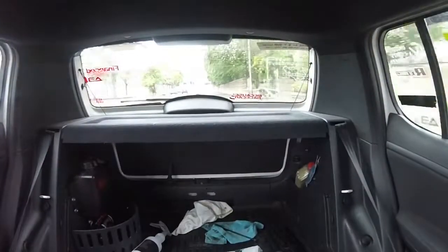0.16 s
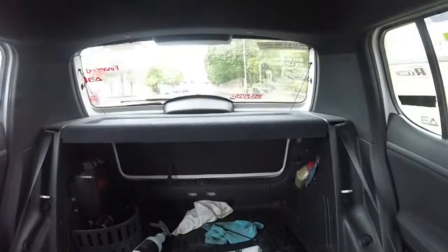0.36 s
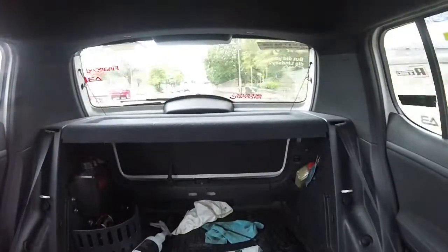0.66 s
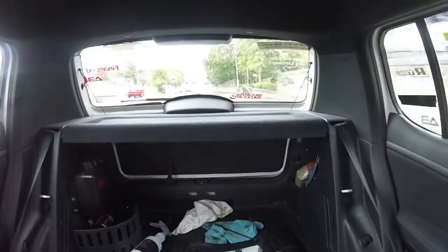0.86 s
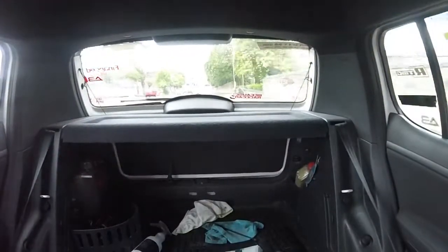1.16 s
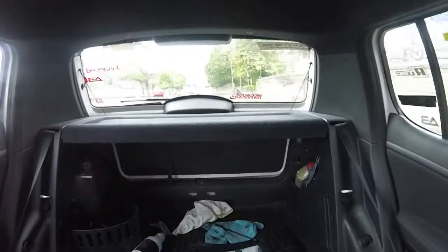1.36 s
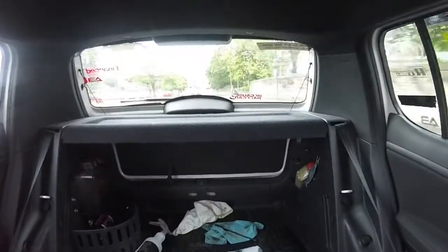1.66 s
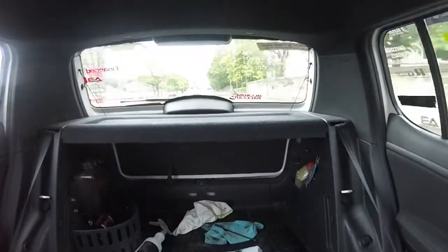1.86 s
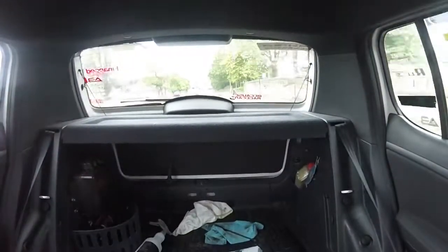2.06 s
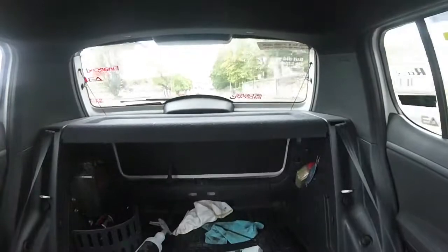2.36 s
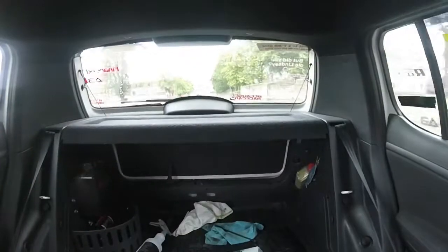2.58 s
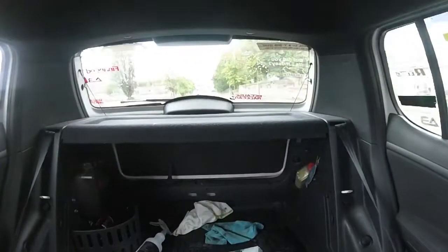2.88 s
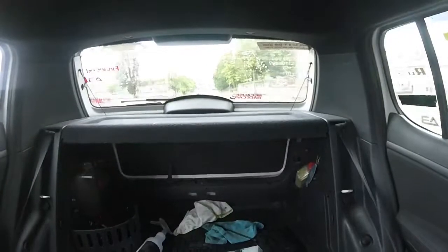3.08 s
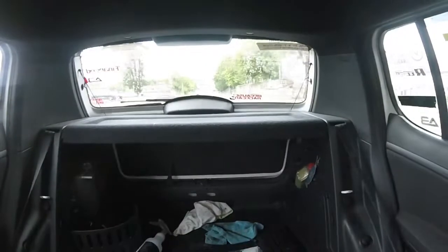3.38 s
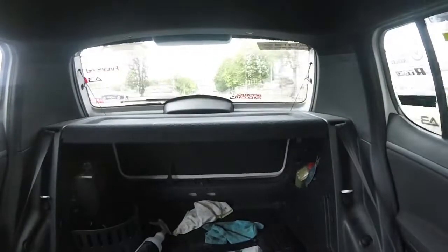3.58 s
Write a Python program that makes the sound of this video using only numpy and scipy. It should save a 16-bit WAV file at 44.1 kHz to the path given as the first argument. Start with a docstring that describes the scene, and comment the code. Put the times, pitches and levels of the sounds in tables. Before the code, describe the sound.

A car engine drones loudly and climbs in pitch inside the cabin, then the throttle lifts with a falling airy howl, a flutter of chuffs and low thumps, over steady road rumble, heard by a close interior microphone.

```python
"""Inside a small sporty car on the move, over road rumble that lasts throughout.
First the engine pulls: its notes rise through the booms of the cabin, with gear whine and clatter.
The throttle lifts: a howl with hissing air, probably vented boost, falls in pitch.
It breaks into a flutter of chuffs, each a short tone of sagging pitch, among low thumps and ticks of the trim.
Towards the end a light drone of a few steady lines comes up."""
import sys
import numpy as np
from scipy import signal
from scipy.fft import rfft, irfft
from scipy.io import wavfile
from scipy.ndimage import uniform_filter1d

SR = 44100
rng = np.random.default_rng(int(sys.argv[2]) if len(sys.argv) > 2 else 0)


def generate_wav(sig):
    """Save sig (samples, or channels by samples) to the path in sys.argv[1] as 16-bit PCM at SR."""
    pcm = np.round(np.clip(np.atleast_2d(sig).T, -1, 1) * 32767).astype(np.int16)
    wavfile.write(sys.argv[1], SR, pcm)


N = 164493  # length in samples
T = np.arange(N) / SR  # time of each sample, s
HZ = np.fft.rfftfreq(N, 1 / SR)  # frequencies of the spectrum, Hz

# how hard the engine pulls, heard in exhaust and gears: t/s, level/dB
LOAD = [(0, -4.5), (.1, -0.5), (1.32, -0.5), (1.42, -7), (1.6, -19.5), (1.9, -33)]


def amp(db):
    """Turns decibels into a gain."""
    return 10 ** (np.asarray(db) / 20)


def unit(x):
    """Scales a signal to an rms of one."""
    return x / np.sqrt(np.mean(x ** 2) + 1e-20)


def curve(points):
    """Joins (time, value) points by straight lines, giving a value at every sample."""
    return np.interp(T, *np.transpose(points))


def spectrum(points):
    """Joins (frequency, dB) points along a log frequency scale."""
    f, db = np.transpose(points)
    return np.interp(np.log(HZ + 1), np.log(f), db)


def colour(x, db):
    """Filters a signal by a dB spectrum, then scales it to an rms of one."""
    return unit(irfft(rfft(x) * amp(db), N))


def noise(db):
    """Makes noise with a dB spectrum and an rms of one."""
    return colour(rng.standard_normal(N), db)


def drift(hz):
    """Makes smooth random motion, which fades out above about hz; its rms is one."""
    return unit(irfft(rfft(rng.standard_normal(N)) * np.exp(-(HZ / hz) ** 2), N))


def bell(hz, centre, width):
    """Gives the gain of a resonance: one at its centre, falling on both sides."""
    return 1 / (1 + (np.sqrt(2) * (hz - centre) / width) ** 2)


def add(mix, s, sound):
    """Mixes a sound in at time s, cutting it where the mix ends."""
    part = mix[round(s * SR):][:len(sound)]
    part += sound[:len(part)]


def swell(t, rise_s):
    """Makes a rounded pulse that peaks at one after rise_s seconds."""
    return (t / rise_s * np.exp(1 - t / rise_s)) ** 2


def exhaust(speed, turns):
    """Whole and weaker half multiples of the crank speed swell as they cross the cabin booms."""
    # resonances of the cabin: f/Hz, width/Hz, level/dB
    booms = [(68, 14, -25.5), (75, 4.2, -18.5), (127.2, 9, -21), (146.3, 5.6, -17), (148.3, 7, -21),
             (203.9, 10.05, -14.5), (218.2, 10, -27.5), (269.3, 11, -35.5), (294, 22, -27.5),
             (323.2, 26, -31), (373.5, 21, -31.5), (437.9, 12, -31), (497, 26, -32), (500, 34, -46.5),
             (584, 5.4, -35.5)]
    grid = np.arange(20, 2000)  # Hz
    # between the booms: -58 dB up to 500 Hz, then 25.5 dB less per octave
    plain = amp(-58 - 25.5 * np.log2(np.maximum(grid / 500, 1)))
    boom_power = sum((amp(db) * bell(grid, f, width)) ** 2 for f, width, db in booms)
    whole_gain = np.sqrt(plain ** 2 + boom_power)
    half_gain = np.hypot(whole_gain * amp(-12), plain / 2)
    out = np.zeros(N)
    for k in range(2, 26):  # counts half orders, so odd k lies between whole multiples
        gain = np.interp(k / 2 * speed, grid, half_gain if k % 2 else whole_gain)
        start_phase = 2 * np.pi * rng.random()
        out += gain * np.sin(np.pi * k * turns + start_phase)
    unsteady = 1 + 0.16 * drift(hz=25)
    return np.sqrt(2) * out * amp(curve(LOAD)) * unsteady


def whine(turns):
    """The gears sing at thin high multiples of the crank speed, loudest while the engine pulls."""
    # lines of the whine: multiple of crank speed, level/dB
    gear_lines = [(11, -43), (12, -54), (14, -56)]
    lines = np.zeros(N)
    for multiple, db in gear_lines:
        unsteady = 1 + 0.1 * drift(hz=9)
        lines += amp(db) * np.sin(2 * np.pi * multiple * turns) * unsteady
    return np.sqrt(2) * lines * amp(curve(LOAD))


def clatter(turns):
    """Hiss pulsing with each firing, twice a turn, rings the resonances of the engine casing."""
    # loudness of clatter and intake hiss: t/s, level/dB
    clatter_level = [(0, -36), (.4, -34.5), (1.25, -33.5), (1.42, -36.5), (1.8, -39), (2.05, -46),
                     (2.45, -51.5), (2.7, -46), (3.1, -44.5), (3.72, -43.5)]
    # broad tone colour: f/Hz, relative level/dB
    clatter_colour = [(150, -12), (400, 9), (700, 7.5), (1100, -1.5), (1450, -5.5), (2200, -9), (3400, -15),
                      (4600, -21), (5600, -17), (6600, -18), (7900, -29.5), (9300, -34.5), (10300, -42),
                      (14000, -49)]
    # casing resonances: f/Hz, width/Hz, boost/dB
    casing = [(1020, 50, 4.9), (1160, 30, 6.4), (1590, 33, 5), (2057, 54, 8.4), (2350, 60, 7.5),
              (2592, 23, 6), (3024, 32, 10.4), (3300, 50, 6.5), (3670, 50, 5.9), (4000, 35, 6.5),
              (6430, 130, 5.3), (7470, 40, 4.1)]
    puffs = rng.standard_normal(N) * (1 + 0.083 * np.cos(4 * np.pi * turns))
    # small random ups and downs along the spectrum, 1.2 dB rms
    smooth = uniform_filter1d(rng.standard_normal(len(HZ)), size=90)
    ripple_db = 1.2 * unit(uniform_filter1d(smooth, size=60))
    casing_db = sum(boost * bell(HZ, f, width) for f, width, boost in casing)
    ringing = colour(puffs, spectrum(clatter_colour) + casing_db + ripple_db)
    return ringing * amp(curve(clatter_level))


def howl(turns):
    """A rough, throbbing tone with two overtones, wrapped in rushing air, falls as the pressure drains."""
    # pitch of the howl: t/s, f/Hz
    howl_pitch = [(1.38, 570), (1.46, 578), (1.52, 556), (1.57, 532), (1.63, 506), (1.69, 479), (1.76, 435),
                  (1.83, 396), (1.89, 376), (2.0, 337), (2.25, 331)]
    # loudness of its main tone: t/s, level/dB
    howl_level = [(1.35, -45), (1.40, -34), (1.455, -23.5), (1.485, -29), (1.56, -17), (1.625, -28),
                  (1.66, -21), (1.7, -19), (1.72, -28), (1.77, -18), (1.82, -36), (1.885, -21),
                  (1.94, -40.5), (2.03, -33), (2.2, -32), (2.3, -55)]
    # loudness of its overtones: t/s, level/dB
    overtone_level = [(1.38, -60), (1.47, -41.5), (1.51, -39.5), (1.55, -31), (1.61, -33.5), (1.65, -59),
                      (1.72, -51), (1.77, -35), (1.81, -59), (2, -71)]
    # loudness of the air rushing out with it: t/s, level/dB
    rush_level = [(1.33, -45.5), (1.45, -27), (1.57, -36), (1.7, -34), (1.9, -44.5), (2.2, -44),
                  (2.35, -67)]
    pitch = curve(howl_pitch) * (1 + 0.01416 * drift(hz=60))
    phase = 2 * np.pi * np.cumsum(pitch) / SR
    tone = amp(curve(howl_level)) * np.sin(phase) * (1 + 0.2 * drift(hz=72.5))
    overtones = np.sin(2 * phase) + amp(-14) * np.sin(3 * phase)
    overtones *= amp(curve(overtone_level)) * (1 + 0.5 * drift(hz=70))
    throb = 1 + 0.21 * np.cos(2 * np.pi * turns)  # beats once a turn of the crank

    def rush_around(p):
        """Random swings on a tone spread it into a band of noise around its pitch."""
        spread_hz = 236
        return drift(spread_hz) * np.sin(p) + drift(spread_hz) * np.cos(p)

    rush = rush_around(phase) + amp(-13.5) * rush_around(2 * phase)
    return np.sqrt(2) * (tone + overtones) * throb + amp(curve(rush_level)) * rush


def vent():
    """Air hisses out while the howl sounds: noise with a set tone colour and loudness."""
    # loudness of the hiss: t/s, level/dB
    vent_level = [(1.35, -70), (1.5, -57.5), (1.59, -57), (1.63, -50), (1.66, -63), (1.8, -63), (1.95, -64),
                  (2.1, -77)]
    # its tone colour: f/Hz, relative level/dB
    vent_colour = [(900, -18.5), (2000, 1.5), (3200, -3.5), (4700, 0.5), (6000, -8), (8000, -15.5),
                   (13000, -28)]
    return noise(spectrum(vent_colour)) * amp(curve(vent_level))


def flutter():
    """Each chuff is a few cycles of sagging pitch with a puff of air."""
    # chuffs, each from its start: t/s, level/dB
    chuffs = [(1.997, -27.5), (2.063, -28), (2.132, -17), (2.201, -18), (2.273, -22), (2.332, -30),
              (2.470, -26.5), (2.645, -30.5), (2.724, -25), (2.873, -27.5), (2.947, -26), (3.005, -23),
              (3.206, -26.5), (3.428, -28)]
    start_hz, sag_s, rise_s, air_share = 605, 0.027, 0.0046, 0.15
    out, t = np.zeros(N), T[T < .04]
    # f/Hz, relative level/dB
    air = noise(spectrum([(150, 2), (400, 7), (650, -8), (1000, -22.5), (3000, -35), (9000, -64)]))
    phase = 2 * np.pi * np.cumsum(start_hz * np.exp(-t / sag_s)) / SR
    for s, db in chuffs:
        puff = air_share * air[round(s * SR):][:len(t)]
        add(out, s, amp(db) * swell(t, rise_s) * (np.sin(phase) + puff))
    return out


def thumps():
    """Short low pushes shake the cabin: each is a rounded pulse of a low tone."""
    # thumps, each from its start: t/s, level/dB, f/Hz
    pushes = [(2.139, -17, 75), (2.206, -7, 95), (2.274, -1.5, 50), (2.631, -3.5, 110), (2.793, -6.5, 45.4),
              (2.949, -7.5, 135), (3.004, -5.5, 105), (3.074, -5, 80)]
    out, t = np.zeros(N), T[T < .08]
    for s, db, hz in pushes:
        add(out, s, -amp(db) * swell(t, rise_s=0.0061) * np.sin(2 * np.pi * hz * t))
    return out


def ticks():
    """Loose trim snaps now and then: a sharp click and a tiny scatter of noise that dies away."""
    # snaps of the trim: t/s, level/dB
    snaps = [(2.231, -30.5), (3.032, -48)]
    # their tone colour: f/Hz, relative level/dB
    tick_colour = [(600, -6), (2000, 2), (4500, 0), (7000, -5), (10500, -17), (14000, -19)]
    decay_s, scatter_share = 0.001, 0.15
    strikes, t = np.zeros(N), T[T < .02]
    for s, db in snaps:
        click = t == 0  # a single sample
        scatter = scatter_share * rng.standard_normal(len(t)) * np.exp(-t / decay_s)
        add(strikes, s, amp(db) * (click + scatter))
    gain = amp(spectrum(tick_colour))
    return irfft(rfft(strikes) * gain / gain.mean(), N)


def drone():
    """A few engine lines at fixed pitches, wavering in phase, come up after the lift."""
    # lines of the drone: f/Hz, relative level/dB
    drone_lines = [(49.5, -30), (197, -27.5), (248, -27.5), (296, -48)]
    # loudness of them all: t/s, level/dB
    drone_level = [(2.6, -35.5), (2.95, -8.5), (3.3, -3), (3.72, -3)]
    lines = np.zeros(N)
    for hz, db in drone_lines:
        waver = 0.5 * drift(hz=13)  # radians
        lines += amp(db) * np.sin(2 * np.pi * hz * T + waver)
    return np.sqrt(2) * lines * amp(curve(drone_level))


def road():
    """Lumpy body rumble lies under a flickering roar of tyres and air, both made of noise."""
    # tone colour of the rumble: f/Hz, relative level/dB
    rumble_colour = [(8, -26), (17, -5.5), (28, -4), (44, 3.5), (62, -2), (105, -2.5), (160, -6),
                     (200, -10.5), (250, -18), (320, -30.5), (600, -51.5), (1500, -81.5)]
    # loudness of the rumble: t/s, level/dB
    rumble_level = [(0, -22.5), (.3, -22), (.6, -15.5), (1.3, -16.5), (1.6, -15.5), (2.05, -15),
                    (2.28, -15.5), (2.45, -15.5), (2.8, -13.5), (3.05, -16), (3.3, -16), (3.72, -18)]
    # tone colour of the roar: f/Hz, relative level/dB
    roar_colour = [(100, 3.5), (350, 6.5), (500, 1), (700, -4.5), (1150, -9.5), (1600, -18), (2500, -29),
                   (3300, -38), (4500, -40), (6000, -43.5), (6550, -35), (7300, -42.5), (9000, -44.5),
                   (10200, -63), (13500, -52)]
    # loudness of the roar: t/s, level/dB
    roar_level = [(0, -42.5), (1.3, -40), (1.55, -33), (1.9, -31.5), (2.4, -31.5), (3, -33.5), (3.72, -36)]
    lumps_db = 0.5 * drift(hz=12)
    flicker_db = 2 * drift(hz=38.7)
    rumble = noise(spectrum(rumble_colour)) * amp(curve(rumble_level) + lumps_db)
    roar = noise(spectrum(roar_colour)) * amp(curve(roar_level) + flicker_db)
    return rumble + roar


def scene():
    """Adds up everything heard in the cabin; one crank drives exhaust, whine, clatter and throb."""
    # crank speed: t/s, turns per second
    crank_speed = [(0, 64.3), (.12, 65.3), (.424, 68.0), (.62, 69.3), (.916, 71.7), (1.028, 72.7),
                   (1.294, 74.8), (1.4, 74.8), (1.6, 70.5)]
    speed = curve(crank_speed)
    jitter = 1 + 0.001 * drift(hz=15)
    turns = np.cumsum(speed * jitter) / SR  # turns made so far
    engine = exhaust(speed, turns) + whine(turns) + clatter(turns) + drone()
    lift = howl(turns) + vent() + flutter()
    return (engine + lift + thumps() + ticks() + road())[None]


def record(dry):
    """The recorder rounds off the highest peaks and cuts the treble above its band."""
    ceiling, edge_hz = 0.8, 13900
    rounded = dry / (1 + (dry / ceiling) ** 8) ** (1 / 8)
    low_pass = signal.firwin(511, edge_hz, window=("kaiser", 9), fs=SR)
    return signal.oaconvolve(rounded, low_pass[None], "same")


dry = scene()
out = record(dry)
generate_wav(out)
```